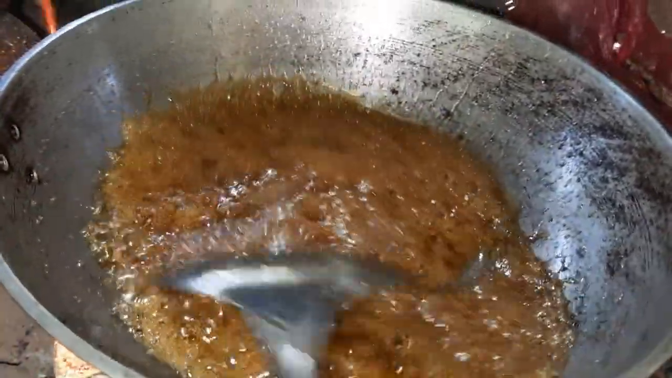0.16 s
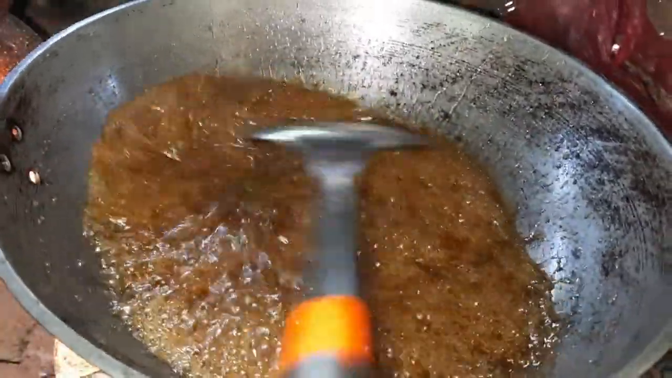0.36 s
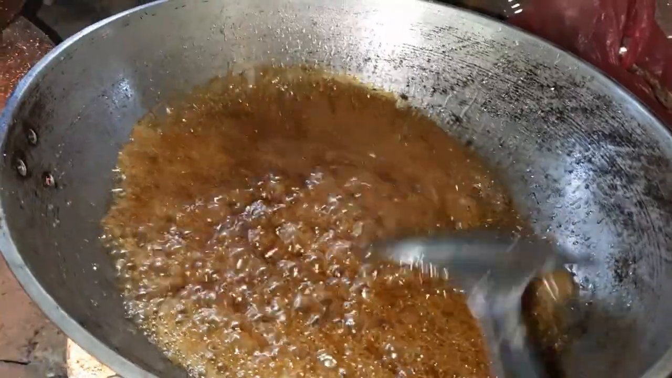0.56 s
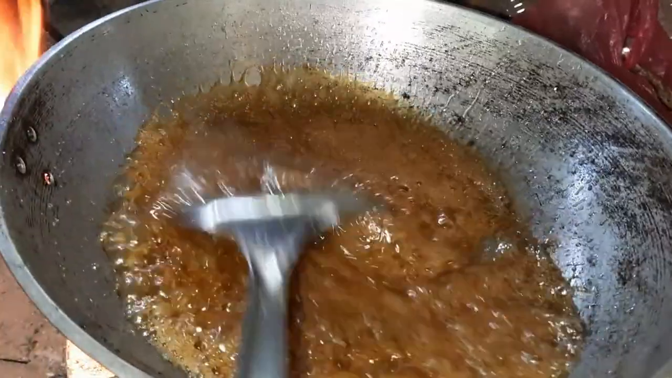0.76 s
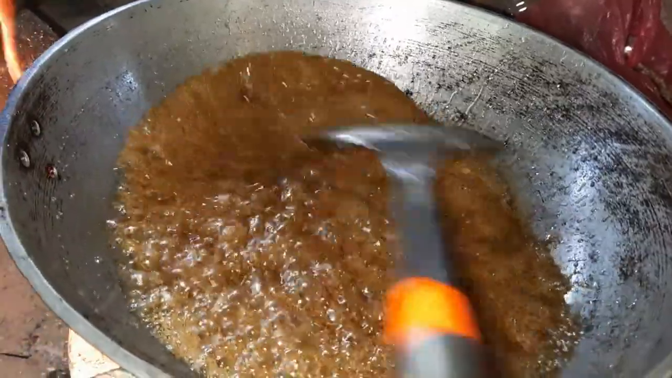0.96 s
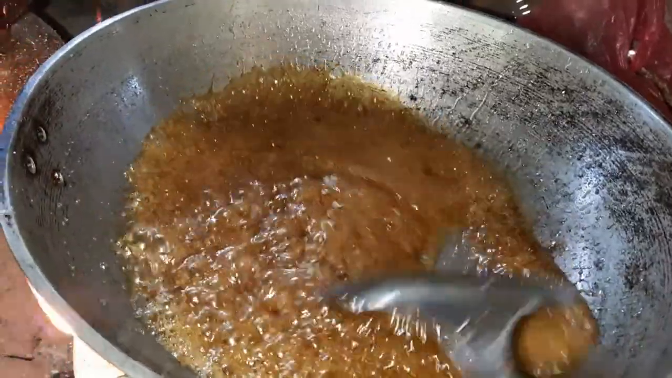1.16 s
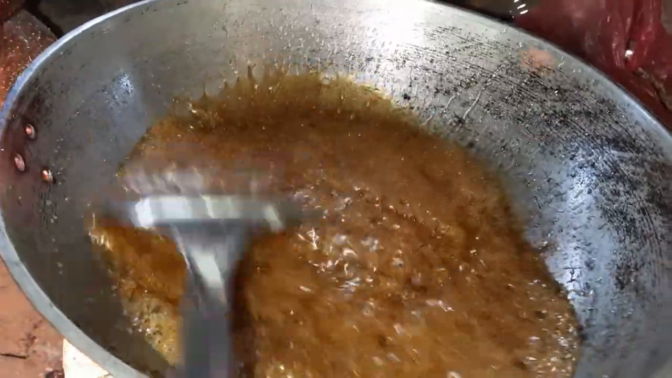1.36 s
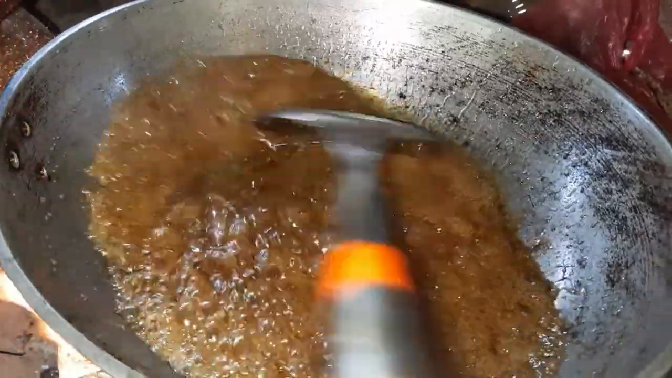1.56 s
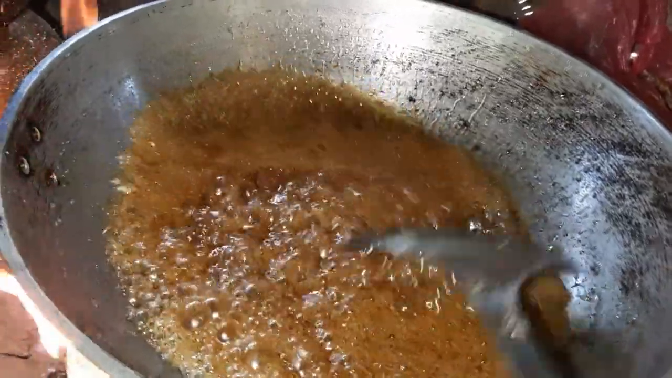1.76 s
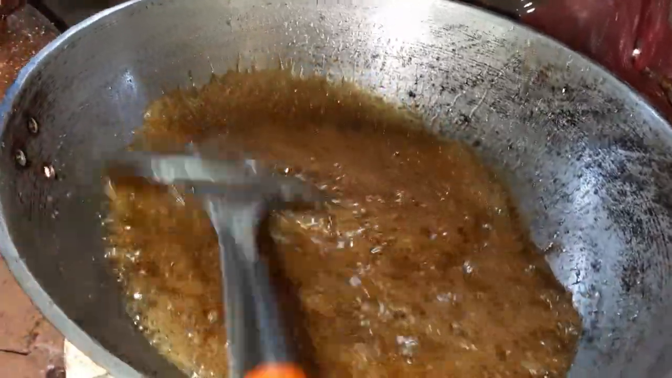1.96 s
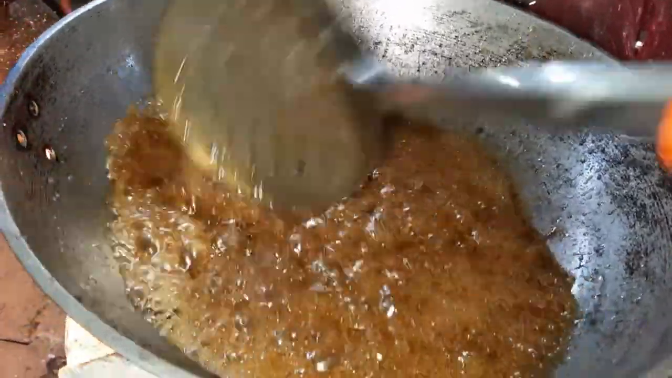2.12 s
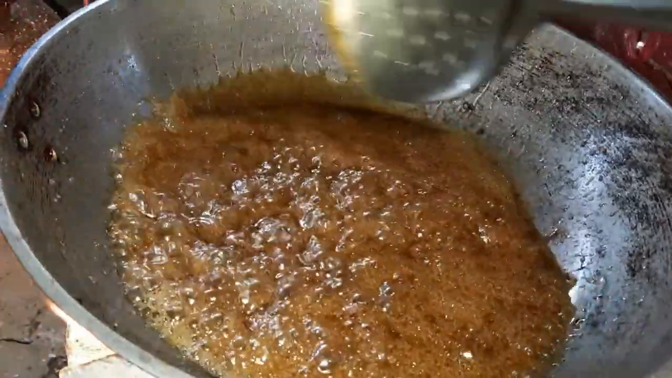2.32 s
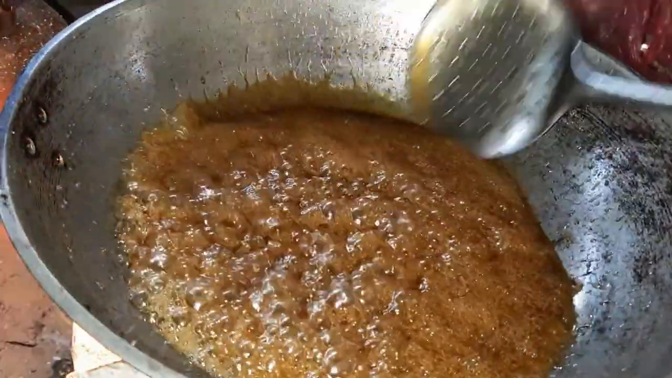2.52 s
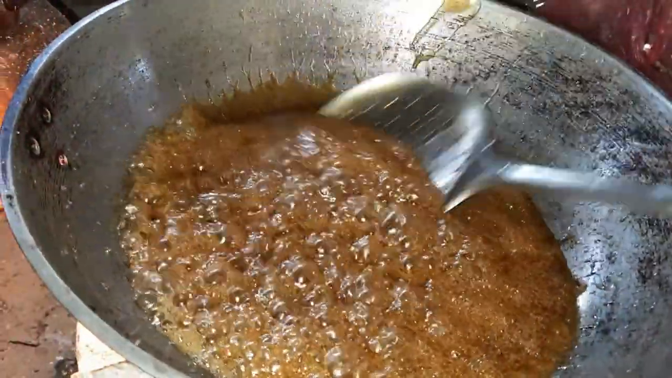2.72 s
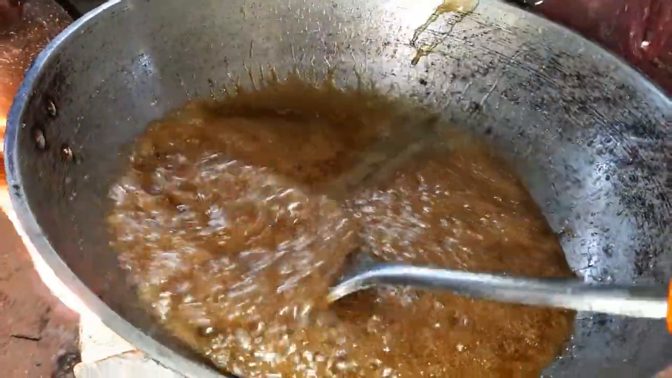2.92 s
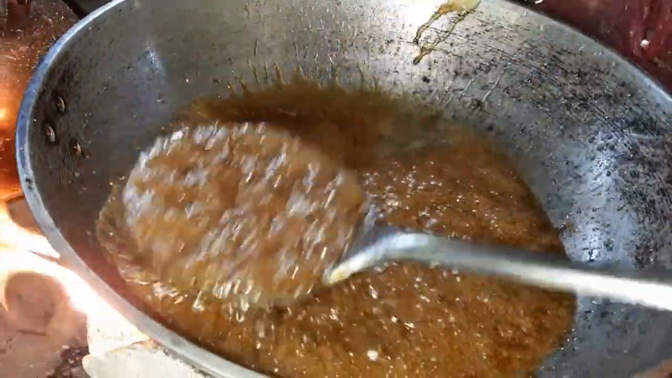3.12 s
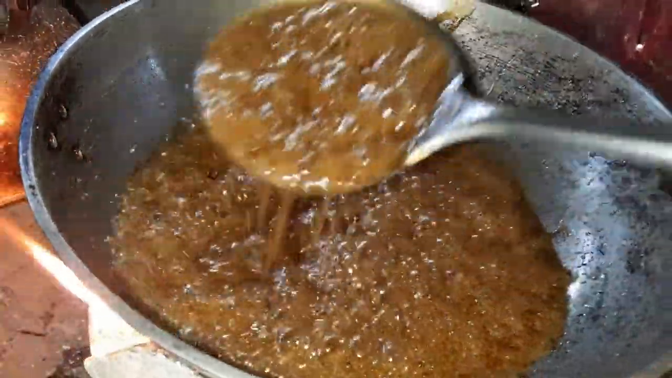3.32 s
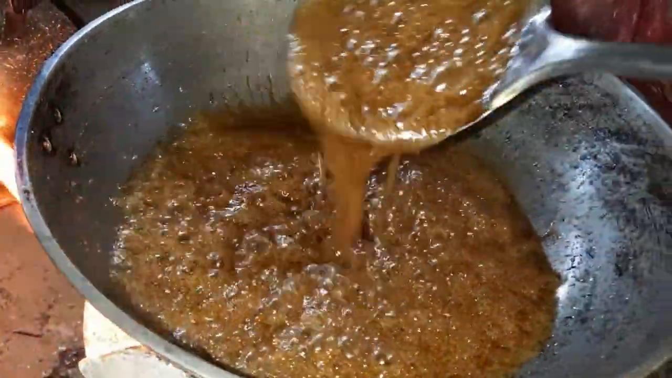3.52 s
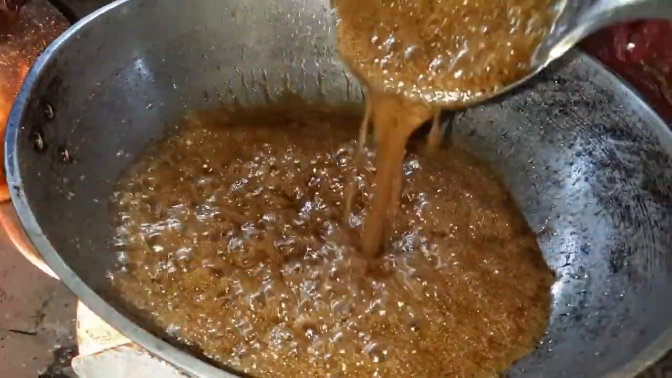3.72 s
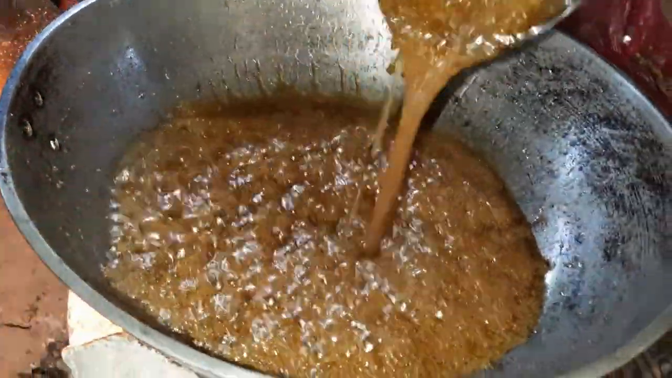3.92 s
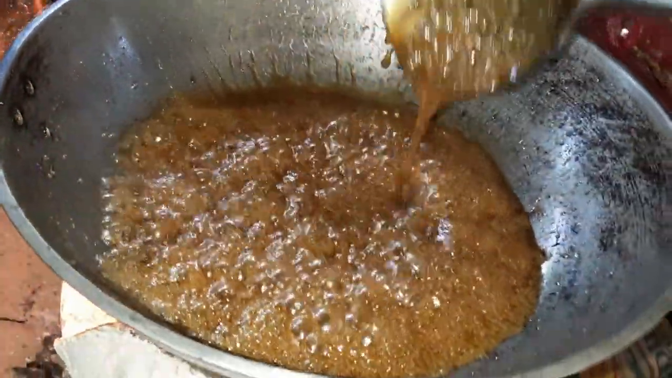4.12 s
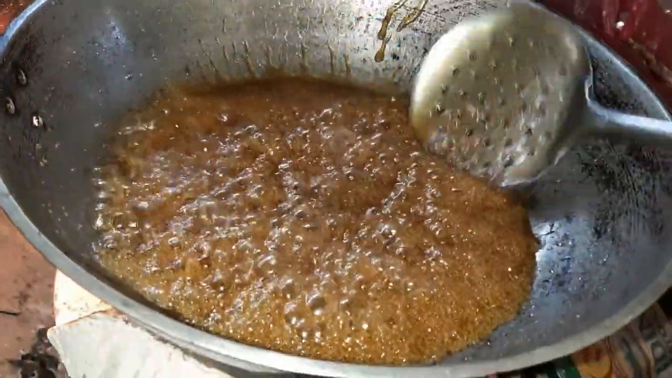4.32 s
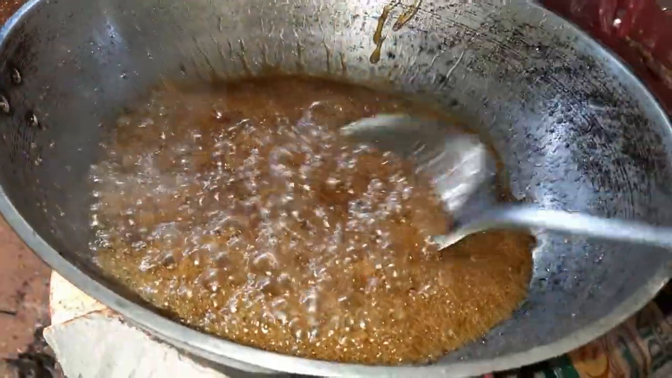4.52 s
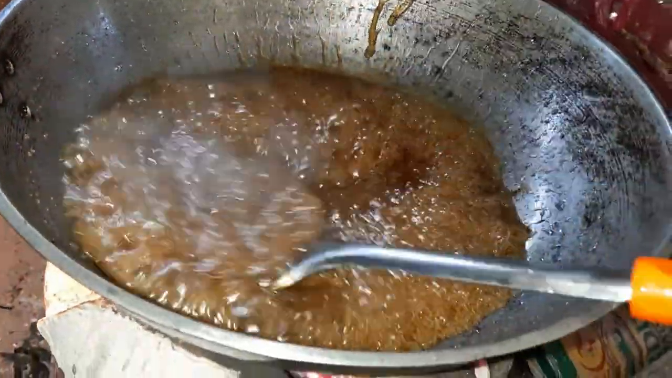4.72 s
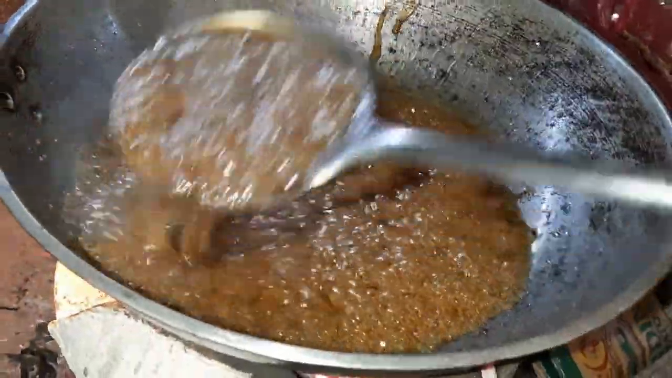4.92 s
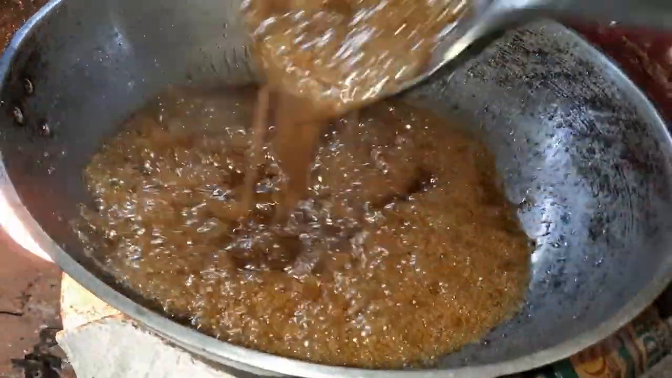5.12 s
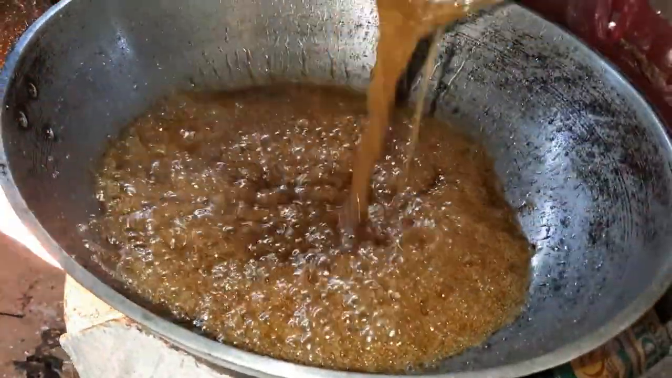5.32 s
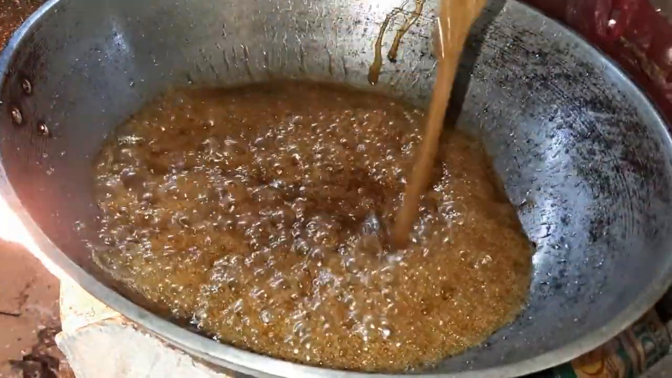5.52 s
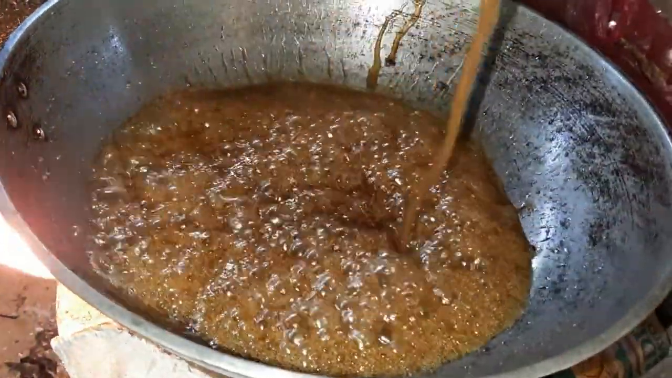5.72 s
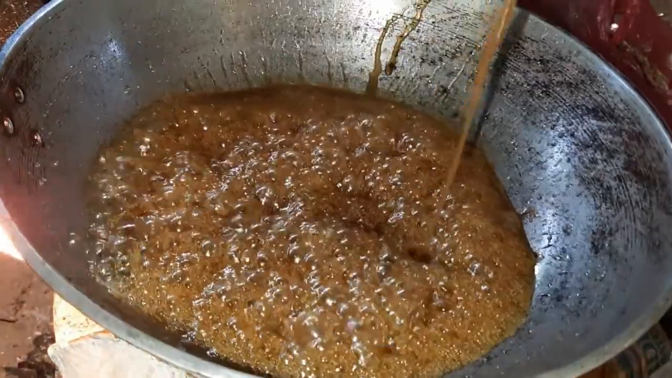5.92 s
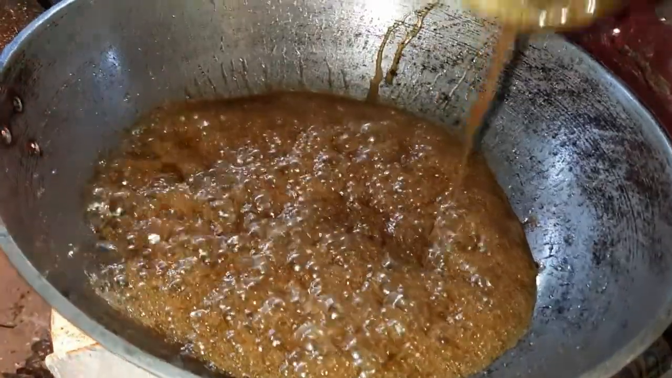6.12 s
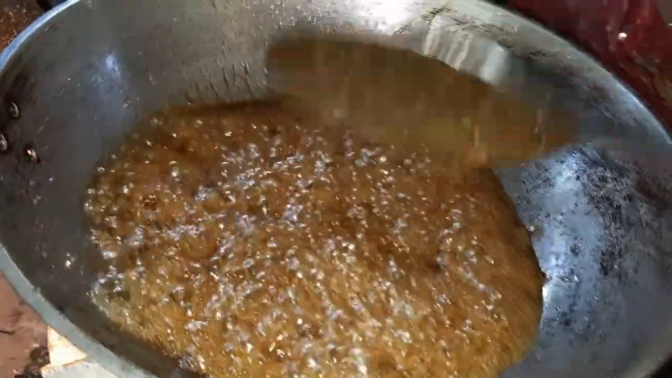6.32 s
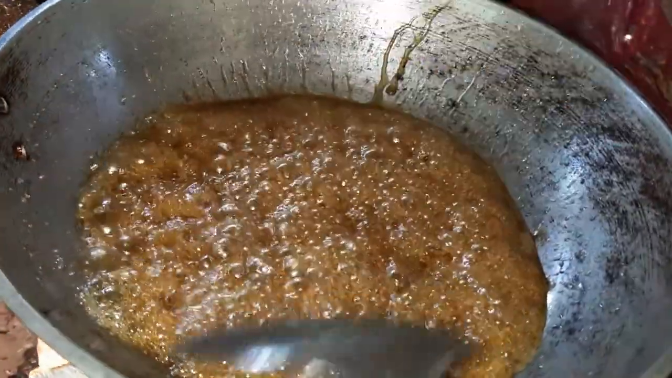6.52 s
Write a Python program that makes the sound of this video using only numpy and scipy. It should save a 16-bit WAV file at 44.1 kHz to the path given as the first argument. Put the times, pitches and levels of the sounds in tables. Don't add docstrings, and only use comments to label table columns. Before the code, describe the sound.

Close metallic scraping and damped clanks in a wok give way to bubbling, crackling thick syrup, ending with a sharp clang and faint bird whistle.

```python
import sys
import numpy as np
from scipy import signal
from scipy.fft import rfft, irfft, next_fast_len
from scipy.io import wavfile
from scipy.ndimage import uniform_filter1d, map_coordinates

SR = 44100
rng = np.random.default_rng(int(sys.argv[2]) if len(sys.argv) > 2 else 0)


def bounce(signal):
    frames = np.transpose(np.atleast_2d(signal))
    limited = np.clip(frames, -1, 1)
    pcm = np.round(limited * 32767).astype(np.int16)
    wavfile.write(sys.argv[1], SR, pcm)


def nominal_scale(level):
    x = np.asarray(level, float) / 20
    return 10 ** x


N = 294147
T = np.arange(N) / SR

# (start [s], level [dB], swell over the note [dB])
BIRD_NOTES = [
    (6.065, -65, 1),
    (6.268, -53, 10),
    (6.472, -54.5, 6),
]
# (frequency [Hz], level [dB per Hz])
RUMBLE_COLOUR = [(12, -53.5), (20, -27), (72, 2.5), (200, -2.5), (260, -13.5), (440, -120)]
# (start [s], hold [s], rumble level [dB])
JOLTS = [(0, .01, -63), (.07, .01, -66), (.25, 0.21, -70), (.8, 0.018, -64), (.88, 0.13, -62.5),
         (1.08, 0.19, -71), (1.41, 0.0088, -50), (1.5, 0.024, -52), (1.73, 0.0085, -60),
         (1.85, 0.34, -69.5), (2.57, 0.056, -59), (2.72, 0.016, -78), (2.88, 0.089, -70), (3.25, .01, -69),
         (4.39, 0.076, -61), (4.64, .01, -71.5), (5.07, 0.074, -56), (5.33, 0.11, -64.5), (5.6, 0.07, -68),
         (5.7, 0.11, -61), (5.92, 0.078, -70), (6.27, 0.15, -55.5), (6.48, 0.15, -64), (6.65, 0.018, -56)]

# (time [s], fizz level [dB])
BOIL = [(2.15, -64.5), (2.62, -64), (2.86, -55.5), (3.04, -61.5), (3.37, -65.5), (3.91, -63), (4.26, -65.5),
        (4.64, -60.5), (4.83, -64.5), (5.0, -67), (5.2, -64.5), (5.46, -58), (5.574, -62.5), (5.77, -56.5),
        (5.91, -62), (6.11, -64), (6.2, -63.5), (6.55, -64)]
# (frequency [Hz], level [dB per Hz])
FIZZ_COLOUR = [(150, -54), (250, -33), (393, -10.5), (460, -22), (1100, -11), (1470, 4.5), (1670, 0),
               (2050, -13.5), (2240, -14), (4490, -7.5), (8550, -29), (11300, -7.5), (16000, -16.5)]
# (frequency [Hz], width [Hz], level [dB])
FIZZ_RING = [(680, 194, 1.5), (1540, 16, -11), (2060, 210, 1), (7790, 620, 6), (11200, 580, -8.5),
             (14500, 4600, -15)]
# (time [s], peak [dB], centre [Hz])
POPS = [(2.2056, -53, 9000), (2.3233, -44, 2480), (2.3378, -39, 4470), (2.402, -44, 6000),
        (2.608, -29, 2200), (2.6162, -33, 4730), (3.562, -48, 11200), (5.04, -48, 4000), (5.158, -40, 5000),
        (5.19, -45, 4500), (5.2994, -50, 4000), (5.46, -29, 7500), (5.9529, -33, 3930), (6.1974, -50, 7000),
        (3.448, -43, 11200), (3.5084, -45, 4130), (3.7513, -42, 4300), (3.9032, -32, 3260),
        (4.1828, -40, 12000), (4.2143, -44, 4440), (4.24, -42, 5300), (4.7697, -41, 4260),
        (5.075, -37.5, 2960), (5.2331, -47, 11000), (5.4117, -35, 14500), (5.442, -30.5, 6860),
        (5.516, -35.5, 4380), (5.5913, -30, 11900), (5.6086, -28.5, 3960), (5.685, -39, 2760),
        (5.7105, -34, 5300), (5.744, -26, 7160), (5.8143, -32, 11600), (5.9268, -31, 6300),
        (5.987, -32, 5200), (6.0702, -35, 14700), (6.1088, -29, 2630), (6.2612, -32, 4650),
        (6.3067, -31, 2900), (6.4018, -34.5, 6900)]
# (time [s], peak [dB], centre [Hz], time to fall 60 dB [s])
GULPS = [(2.997, -35.5, 536, 0.24), (5.037, -52, 596, 0.044), (5.053, -43, 536, 0.14),
         (5.085, -27, 334, 0.053), (5.121, -47, 355, 0.053), (5.494, -39.5, 437, 0.063),
         (5.682, -37.5, 439, 0.047), (5.764, -36.5, 431, 0.11), (6.106, -47, 710, 0.18),
         (5.292, -38, 336, 0.052), (5.056, -43, 230, .07), (5.087, -41, 190, 0.09),
         (5.755, -46, 220, 0.089), (5.562, -50, 686, .05), (5.847, -41.5, 323, 0.067),
         (6.277, -50, 417, 0.042), (6.299, -35, 288, 0.17), (6.384, -29, 267, .07),
         (6.455, -36, 522, 0.044), (6.501, -37.5, 290, 0.062)]
# (frequency [Hz], level [dB per Hz])
SLOSH_COLOUR = [(88, -48), (150, -27.5), (295, -8), (552, -8), (667, -20), (1100, -17), (1620, -19.5),
                (2220, -18), (3000, -39), (3900, -67.5), (6600, -120)]
# (start [s], hold [s], slosh level [dB])
SURGES = [(2.2, 0.25, -67), (4.64, 0.024, -52), (5.08, 0.024, -37.5), (5.3, 0.012, -45), (5.43, 0.092, -58),
          (5.6, 0.045, -57), (5.76, 0.03, -46), (5.87, 0.023, -58), (6.1, 0.09, -53.5),
          (6.29, 0.049, -35.5), (6.39, 0.067, -42.5), (6.52, 0.044, -45.5)]

# (frequency [Hz], width [Hz], level [dB])
WOK = [(284, 110, -8.5), (407.5, 17, -3), (437.6, 14, 2), (567, 49, -10), (636, 26, -0.5), (695, 50.6, 1.5),
       (930, 87, -3.5), (1111, 82, -4), (1348, 102, -6.5), (1360, 63, -6.5), (1460, 58, -27.5),
       (1515, 52, -1.5), (1514.6, 30, -24.5), (1751, 54, -5), (1824, 58, -5.5), (1970, 83, -1),
       (2310, 77, -11.5), (2563, 64, -4.5), (2730, 41, -1.5), (3360, 910, -18.5), (4046, 120, -1),
       (4440, 15, 0.5), (4635, 12, 4), (5070, 144, -7), (5590, 52, -8.5), (6300, 43, -11), (6990, 36, -2.5),
       (7330, 160, -31)]
# (frequency [Hz], width [Hz], level [dB])
LADLE = [(1205, 52.8, -6.5), (2030, 12, -11.5), (2400, 50, -5), (2870, 41, -9), (3356, 79, -5),
         (4160, 26, -1), (4735, 38, -3.5), (5200, 41.3, -5), (6180, 57, -14), (6860, 48, -13),
         (7600, 79, -8), (10300, 140, -26), (11240, 170, -11.5), (12600, 110, -22.5)]
# (from [s], boom mode [Hz], body mode [Hz], clang mode [Hz], tick mode [Hz])
CONTACTS = [(0, 666, 1360, 1824, 4735), (.12, 675, 1486, 2400, 4600), (.2, 668, 2080, 2550, 4340),
            (.37, 682, 1515, 2640, 3860), (.5, 698, 1327, 1205, 3940), (.58, 670, 1407, 1824, 4440),
            (.69, 636, 2140, 2320, 4735), (.79, 689, 1870, 2580, 5260), (.87, 664, 1387, 2640, 4340),
            (.97, 634, 1515, 1460, 3800), (1.03, 640, 1751, 2720, 4046), (1.081, 645, 1824, 2740, 4735),
            (1.13, 679, 1970, 1430, 4030), (1.18, 636, 1380, 1557, 4130), (1.27, 645, 1420, 2870, 5200),
            (1.36, 606, 1125, 1310, 2730), (1.47, 427, 1382, 1204, 2730), (1.55, 582, 1515, 2630, 4300),
            (1.62, 683, 1717, 2650, 3860), (1.801, 652, 1590, 1404, 1620), (1.9, 673, 1897, 2774, 4440),
            (2.5, 630, 2730, 4046, 5200), (2.57, 636, 444, 567, 1127), (2.6, 430, 2030, 5200, 5590),
            (2.7, 1510, 2030, 4160, 5200), (2.8, 725, 2030, 1377, 2635), (3.2, 567, 1136, 2030, 4160),
            (4.299, 636, 2030, 2505, 4330), (4.39, 691, 2030, 2730, 4440), (4.42, 654, 1310, 1996, 3360),
            (4.55, 750, 1300, 1111, 4520), (4.6, 760, 1205, 1751, 2030), (6.5, 567, 1360, 2782, 5200),
            (6.64, 573, 1205, 2550, 5070)]
# (middle [s], peak [dB], frequency [Hz], half length [s])
SINGS = [(.257, -30, 4390, .01), (0.265, -25.5, 650, 0.016), (0.296, -27.5, 705, 0.012),
         (.33, -29, 1920, .012), (.38, -28.5, 680, 0.013), (.435, -25, 1514, 0.0094),
         (0.644, -26, 1406, 0.0096), (0.822, -25, 1940, 0.0089), (1.197, -27, 1460, 0.016),
         (1.439, -24, 617, 0.0094), (1.505, -19.5, 446, 0.029), (1.528, -18, 1383, 0.008),
         (1.585, -20.5, 1485, 0.0049), (2.857, -22.5, 2050, 0.012), (2.872, -35, 690, 0.0075),
         (4.459, -31, 1316, 0.0077)]
# (time
# [s], peak [dB], frequency [Hz], time to fall 60 dB [s])
RINGS = [
    (1.5017, -11, 1300, .022),
    (2.608, -39, 2220, .03),
    (2.6157, -44, 4850, .03),
    (4.3784, -14.5, 2170, 0.03),
    (4.586, -23, 990, .022),
    (5.055, -40, 525, 0.024),
    (5.125, -45, 257, 0.039),
    (6.577, -33, 5120, 0.23),
    (6.578, -21.5, 8060, .12),
    (6.578, -28, 12600, 0.077),
]
# (time [s], peak [dB], boom [Hz], boom against body [dB], clang against body [dB])
KNOCKS = [(0.07, -16, 470, 4, 1.5), (1.409, -23, 617, -9, -33), (0.1954, -31, 684, 0, -5),
          (0.2152, -23, 690, 3, 3), (0.5772, -21.5, 686, -14, 5), (0.5979, -19, 660, -12, 7),
          (1.4383, -21, 635, 9, -26), (1.501, -10, 440, 3, -23), (1.8147, -39, 665, -8, -7),
          (2.555, -41, 640, -8, 10), (2.577, -20, 530, 8.5, -36), (2.716, -30.5, 890, -31, 10),
          (2.8375, -33, 706, 6, -2), (2.847, -24.5, 700, 2.5, -0.5), (2.909, -34, 700, -2, -8),
          (3.244, -33.5, 533, 5, 4), (4.3764, -10, 680, 0.5, 4.5), (4.393, -22.5, 624, 14.5, 4),
          (4.464, -31, 640, -17, 2), (4.566, -27, 680, 4, -2), (4.575, -22, 780, 5, -6.5),
          (4.5848, -17, 720, 3, 1), (4.616, -25, 700, -2, -15), (4.622, -27.5, 760, 3, -11),
          (4.628, -34, 744, 0, -19), (4.658, -33.5, 692, 18, -23), (4.717, -52, 630, 13, -15),
          (6.577, -3.5, 543, -4.5, 2), (6.5829, -11, 586, -0.5, 3), (6.645, -8.5, 574, -8.5, -8),
          (6.668, -13.5, 850, 2, -20)]
# (frequency [Hz], level [dB per Hz])
RASP_COLOUR = [(88, -43), (150, -23), (354, -55.5), (431, -17), (689, -13), (805, -12.5), (1360, -7),
               (3100, -18.5), (4080, -10), (14800, -24), (16000, -33)]
# (start [s], hold [s], scrape level [dB], edge hiss against scrape [dB], favoured ring [Hz])
STIRS = [(0, 0.12, -34.5, 0, 1630), (0.147, 0.12, -33, -6.5, 1460), (0.246, 0.091, -30.5, -3.5, 1920),
         (0.366, 0.081, -35, -10, 1513), (0.497, 0.045, -30.5, -5, 1460), (0.591, 0.042, -31.5, 0, 1820),
         (0.693, 0.12, -33, -7.5, 1400), (0.761, 0.079, -30.5, -5, 1980), (0.873, 0.11, -38, -3, 1364),
         (1.02, 0.041, -33.5, -7, 1720), (1.106, 0.11, -29.5, -2.5, 1500), (1.29, 0.084, -35.5, -5, 1450),
         (1.437, 0.032, -33.5, 0, 1310), (1.489, 0.02, -26, -6, 1413), (1.591, 0.015, -35.5, -4.5, 1497),
         (1.644, 0.085, -35.5, -4.5, 1715), (1.841, 0.07, -30, -6, 1490), (1.915, 0.093, -32.5, -6.5, 1803)]
# (start [s], hold [s], scrape level [dB], edge hiss against scrape [dB], favoured ring [Hz])
SCUFFS = [(2.07, 0.095, -58.5, -3, 1620), (2.617, 0.018, -47, 4, 5300), (2.852, 0.013, -30, -6, 2060),
          (2.89, 0.067, -49.5, -2, 1700), (4.399, 0.005, -36, -4, 1930), (4.432, 0.02, -40, -3, 1990),
          (4.46, 0.012, -33, -4.5, 1460), (4.57, 0.013, -32, -10, 2130), (4.593, 0.035, -49, 6, 1440),
          (4.655, 0.019, -46, -4.5, 1790), (4.77, 0.026, -65, 11, 1860), (6.586, 0.01, -31, 4.5, 1490),
          (6.615, 0.035, -46, 6, 1540), (6.649, 0.0035, -27.5, 3.5, 1780)]
# (start [s], hold [s], boom level [dB], lowest boom against boom [dB])
PRESSES = [(0, 0.046, -43, -5.5), (0.097, 0.16, -44, -5.5), (0.238, 0.11, -33, -18),
           (0.35, 0.21, -41.5, -8.5), (0.592, 0.081, -44.5, -8), (0.714, 0.23, -33, -14),
           (.97, 0.077, -41.5, -11.5), (1.086, 0.25, -49.5, 0), (1.298, 0.079, -38, -8),
           (1.409, 0.093, -31, -12), (1.49, 0.02, -32, 1.5), (1.571, 0.019, -32.5, -17),
           (1.616, 0.2, -49.5, -0.5), (1.879, 0.14, -35, -15.5), (2.066, 0.11, -66, 2.5),
           (2.833, .01, -49, -18), (2.855, 0.022, -39.5, -18), (2.908, 0.049, -57, 1),
           (4.404, 0.061, -57, -6), (4.569, 0.015, -45, -33), (4.617, 0.042, -45, -24),
           (4.687, .03, -64, -15), (4.771, 0.013, -56, -17), (6.592, 0.044, -60.5, 13.5),
           (6.648, 0.011, -37, 5.5)]

# (frequency [Hz], likeness [0 to 1])
ALIKE = [(100, 1), (500, 0.96), (1400, 0.66), (3000, 0.15), (6000, 0.05), (15000, 0.052)]
# (frequency [Hz], left minus right [dB])
LEAN = [(60, -1), (110, -3.5), (200, 4.5), (380, -5), (700, -1), (1290, 1.5), (2380, 3), (4400, -1.5),
        (8120, -1.5), (15000, 4)]
# (frequency [Hz], delay [ms])
LAG = [(300, 0.37), (700, 0.11), (1550, 0.22), (2800, 0.37), (15000, 0.304)]
# (frequency [Hz], level [dB])
BAND_TOP = [(15300, 0), (15700, -29.5), (16100, -32.5), (16500, -55)]


def unit(x):
    return x / np.sqrt(np.mean(x ** 2) + 1e-20)


def along(points, hz):
    f, v = np.transpose(points)
    return np.interp(np.log(hz + 1), np.log(f + 1), v)


def wobble(rate, size=1):
    knots = rng.standard_normal(int(N * rate / SR) + 4)
    return map_coordinates(knots, [T[::size] * rate], order=1)


def filtered(x, response):
    m = next_fast_len(N + 8192)
    return irfft(rfft(x, m) * response(np.fft.rfftfreq(m, 1 / SR)), m)[..., :N]


def ringing(modes, f):
    return sum((-1) ** k * nominal_scale(db) * 1j * f * w / (c * c - f * f + 1j * f * w)
               for k, (c, w, db) in enumerate(modes))


def step(f, hz):
    return 1 / np.sqrt(1 + (hz / (f + 1)) ** 8)


def swells(rows, slopes):
    s, hold, db = np.transpose(rows)[:3, :, None]
    t = T[::32]
    rise, fall = slopes
    return db - rise * np.maximum(s - t, 0) - fall * np.maximum(t - s - hold, 0)


def summed(db):
    return np.interp(T, T[::32], np.sqrt(np.sum(nominal_scale(db) ** 2, axis=0)))


def steady(x):
    power = np.abs(uniform_filter1d(np.mean(x ** 2, axis=0), size=SR // 12))
    return x / np.sqrt(power + 1e-12)


def patchy(x, depth_db):
    z = signal.stft(x, nperseg=256)[2]
    field = rng.standard_normal(z.shape[1:])
    field = uniform_filter1d(uniform_filter1d(field, size=2, axis=0), size=9, axis=1)
    return signal.istft(z * nominal_scale(depth_db * np.tanh(unit(field))), nperseg=256)[1][:, :N]


def ports(pair, alike):
    turn = lambda f: np.arccos(np.clip(along(alike, f), 0, 1)) / 2
    mid, side = filtered(pair, lambda f: np.array([np.cos(turn(f)), np.sin(turn(f))]))
    return np.array([mid + side, mid - side])


def placed(x):
    sign = np.array([[1], [-1]])
    shade = lambda f: nominal_scale(sign * along(LEAN, f) / 2)
    delay = lambda f: np.exp(-1j * np.pi * f * along(LAG, f) * sign / 1e3)
    return filtered(x, lambda f: shade(f) * delay(f))


def clearness(hz, times):
    from_s, *clear_hz = np.transpose(CONTACTS)
    octaves = 0.045
    match = np.exp(-(np.log2(hz / np.array(clear_hz)) / octaves) ** 2).max(axis=0)
    return match[np.searchsorted(from_s, times, side='right') - 1]


def bird():
    note_s, top_hz, end_hz, slide_s = 0.105, 2420, 2140, 0.042
    out = np.zeros(N)
    for s, db, swell_db in BIRD_NOTES:
        t = np.clip(T - s, 0, note_s)
        hz = end_hz + (top_hz - end_hz) * np.exp(-t / slide_s)
        fade = np.clip(np.minimum(T - s, s + note_s - T) / 0.0078 + 1, 0, 1)
        level_db = db + swell_db * (t / note_s - 1) + 1.3 * wobble(68)
        out += fade * nominal_scale(level_db) * np.sin(2 * np.pi * np.cumsum(hz) / SR)
    return out


def rumble():
    floor_db = -78.5
    noise = ports(rng.standard_normal((2, N)), [(45, 0.15), (80, 0.86)])
    lumps = noise * nominal_scale(6.5 * np.tanh(wobble(30)))
    low = filtered(lumps, lambda f: nominal_scale(along(RUMBLE_COLOUR, f)))
    return (nominal_scale(floor_db) + summed(swells(JOLTS, slopes=(420, 280)))) * unit(low)


def bursts(times, dbs, centres_hz, t60s, octaves, rise, unlike):
    size = 4096
    t, f = np.arange(size) / SR, np.fft.rfftfreq(size, 1 / SR)
    noise = rng.standard_normal((len(times), 3, size))
    shape = np.exp(-.5 * (np.log2((f + 1) / centres_hz[:, None, None]) / octaves) ** 2)
    puff = irfft(rfft(noise[:, :1] + unlike * noise[:, 1:]) * shape, size)
    fading = nominal_scale(dbs[:, None, None] - 60 * t / t60s[:, None, None])
    puff = puff / puff.std(axis=2, keepdims=True) * fading
    out = np.zeros((2, N + size))
    for s, p in zip(times, puff * (1 - np.exp(-t / rise))):
        out[:, round(s * SR):][:, :size] += p
    return out[:, :N]


def fizz():
    hiss = ports(rng.standard_normal((2, N)) * nominal_scale(1.97 * wobble(400)), ALIKE)
    hiss = patchy(hiss, depth_db=4.5)
    ring = lambda f: 1 + nominal_scale(23.5) * np.abs(ringing(FIZZ_RING, f))
    return unit(filtered(hiss, lambda f: nominal_scale(along(FIZZ_COLOUR, f)) * ring(f)))


def small_pops(fizz_db):
    small = rng.random((200, 4))
    times = small[:, 0] * T[-1]
    dbs = np.interp(times, T, fizz_db) - 4.5 - 3.2 * np.log(small[:, 1])
    return bursts(times, dbs, 2500 * 1.85 ** small[:, 2], 0.018 + 0.013 * small[:, 3],
                  octaves=0.53, rise=0.00041, unlike=1.0)


def big_pops():
    s, db, hz = np.transpose(POPS)
    pops = bursts(s, db - 22.0, hz, 0.097 + 0 * s, octaves=0.34, rise=0.0011, unlike=1.0)
    late = rng.exponential(0.0077, (len(s), 3)) * [0, 1, 2]
    for after, drop_db in zip(late.T, (1.5, -4, -7)):
        pops += bursts(s + after, db + drop_db, hz, 0.0017 + 0 * s, octaves=0.84, rise=.0001, unlike=1.0)
    return pops


def gulps():
    s, db, hz, t60 = np.transpose(GULPS)
    return bursts(s, db - 7.5, hz, t60, octaves=0.38, rise=0.0029, unlike=0.14)


def slosh():
    floor_db = -62.5
    surge = nominal_scale(floor_db) + summed(swells(SURGES, slopes=(380, 215)))
    noise = ports(rng.standard_normal((2, N)), ALIKE)
    sound = filtered(noise, lambda f: nominal_scale(along(SLOSH_COLOUR, f)))
    return surge * nominal_scale(5.1 * np.tanh(wobble(45)) - 10.5) * unit(sound)


def syrup():
    fizz_db = np.interp(T, *np.transpose(BOIL))
    return nominal_scale(fizz_db + 7.0) * fizz() + small_pops(fizz_db) + big_pops() + gulps() + slosh()


def lone_modes():
    out = np.zeros(N + SR)
    t = np.arange(-4096, 8192) / SR
    shapes = [np.exp(-(t / row[3]) ** 2) for row in SINGS]
    shapes += [(t > 0) * nominal_scale(-60 * np.abs(t) / row[3]) for row in RINGS]
    for (s, db, hz, _), shape in zip(SINGS + RINGS, shapes):
        out[round((s + t[0]) * SR):][:len(t)] += nominal_scale(db) * shape * np.sin(2 * np.pi * hz * t)
    return filtered(out[:N], lambda f: step(f, 170))


def knocks():
    size = 8192
    blow_s = 0.00003
    struck_db = 10
    t, f = np.arange(size) / SR, np.fft.rfftfreq(size, 1 / SR)
    out = np.zeros((2, N + size))
    for s, db, boom_hz, boom_db, clang_db in KNOCKS:
        noise = rng.standard_normal((3, size))
        t60 = 0.058 + 0.00072 * (db + 38.0)
        blow = 2.3 * np.exp(-.5 * ((t - .0012) / blow_s) ** 2)
        rattle_gain = 0.27 * nominal_scale(0.16 * clang_db - 60 * t / t60) * (1 - np.exp(-t / 0.00024))
        force = blow + (noise[:1] + .5 * noise[1:]) * rattle_gain
        colour = [(0.2 * boom_hz, boom_db - 45.5), (0.53 * boom_hz, boom_db - 16.5),
                  (boom_hz, boom_db + 5.0), (1.39 * boom_hz, boom_db - 10.0),
                  (1300, 4), (2320, clang_db), (4360, clang_db + 0.5)]
        modes = []
        for hz, w, level in sorted(WOK + LADLE):
            mode_db = along(colour, hz) + 0.86 * level + struck_db * clearness(hz, s) + rng.normal(0, 2.43)
            modes.append((hz, 1.87 * w + 45, mode_db))
        crack_db = along(colour, f) - 13.5 + along([(5000, -13.0), (15000, 1.5)], f)
        crack = nominal_scale(crack_db) * 1j * f / (600 + 1j * f)
        soft_hz = 30200 * nominal_scale(0.77 * clang_db)
        hit = irfft(rfft(force) * (ringing(modes, f) + crack) / (1 + 1j * f / soft_hz) ** 3, size)
        out[:, round(s * SR):][:, :size] += nominal_scale(db + 2.5) * hit / np.abs(hit).max()
    return out[:, :N]


def scraped_metal(force, edge_db, ring_hz):
    clear_db = 11
    favoured_hz = uniform_filter1d(ring_hz[edge_db.argmax(axis=0)], size=70)
    rung = 0
    for hz, w, db in WOK + LADLE:
        clear = uniform_filter1d(clearness(hz, T[::32]), size=30)
        near_db = 9 * np.exp(-(np.log2(hz / favoured_hz) / 0.13) ** 2) + clear_db * clear
        swell = np.interp(T, T[::32], nominal_scale(5.35 * np.tanh(wobble(16, size=32)) + near_db))
        rung = rung + swell * nominal_scale(db) * signal.lfilter(*signal.iirpeak(hz, hz / w, SR), force)
    rasp = filtered(patchy(force, depth_db=9.5), lambda f: nominal_scale(along(RASP_COLOUR, f)) * step(f, 1580))
    return unit(rung) + nominal_scale(-9) * unit(rasp)


def scrape():
    slips = rng.standard_normal((2, N)) * nominal_scale(2.2 * wobble(900) + 1.8 * wobble(120) + 2 * wobble(45))
    force = ports(slips, ALIKE)
    lift_s, lift_slope = 2.03, 360
    stir_db = swells(STIRS, slopes=(165, 170)) - lift_slope * np.maximum(T[::32] - lift_s, 0)
    edge_db = np.vstack([stir_db, swells(SCUFFS, slopes=(1940, 600))])
    stirring = sum(row[0] < 2.5 for row in PRESSES)
    boom_db = np.vstack([swells(PRESSES[:stirring], slopes=(660, 410)),
                         swells(PRESSES[stirring:], slopes=(1700, 300))])
    hiss_db, ring_hz = np.transpose(STIRS + SCUFFS)[3:]
    sound = scraped_metal(force, edge_db, ring_hz)
    lowest_db = boom_db + np.array(PRESSES)[:, 3:]
    gains = [summed(db) for db in (lowest_db, boom_db, edge_db, edge_db + hiss_db[:, None])]
    low, mid, high = 530, 900, 3200
    bands = (lambda f: step(f, 324) - step(f, low),
             lambda f: step(f, low) - step(f, mid),
             lambda f: step(f, mid) - step(f, high),
             lambda f: step(f, high))
    return sum(g * steady(filtered(sound, band)) for g, band in zip(gains, bands))


def scene():
    wok = placed(scrape() + knocks() + syrup() + lone_modes())
    return wok + bird() * nominal_scale(np.array([[2.5], [-2.5]])) + rumble()


def top_cut(x):
    return signal.sosfilt(signal.butter(12, 16470, fs=SR, output="sos"), x)


def record(dry):
    finished = filtered(dry, lambda f: nominal_scale(along(BAND_TOP, f)))
    return top_cut(finished)


dry = scene()
out = record(dry)
bounce(out)
```